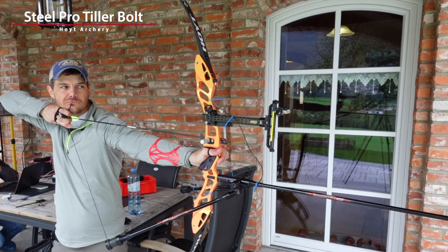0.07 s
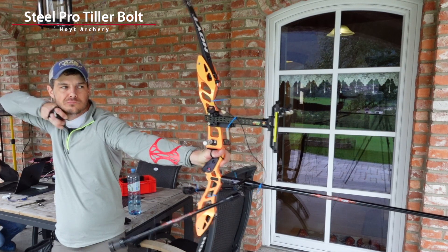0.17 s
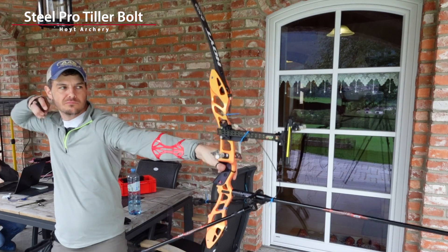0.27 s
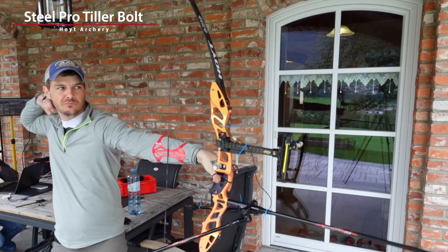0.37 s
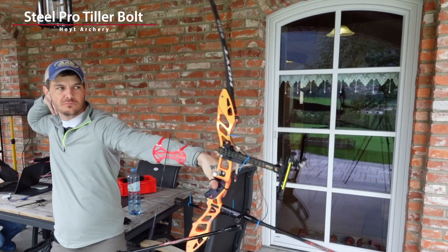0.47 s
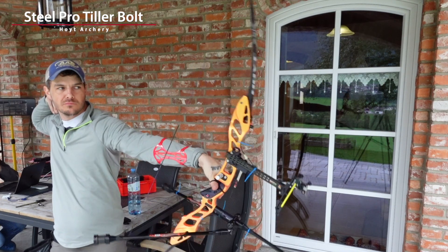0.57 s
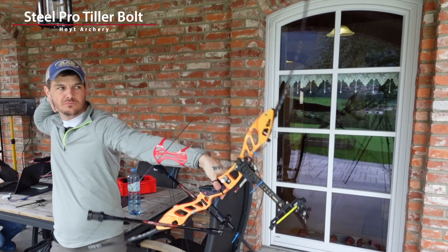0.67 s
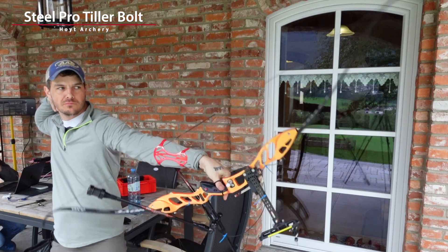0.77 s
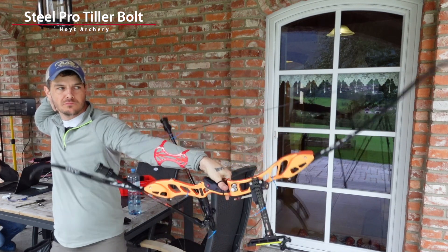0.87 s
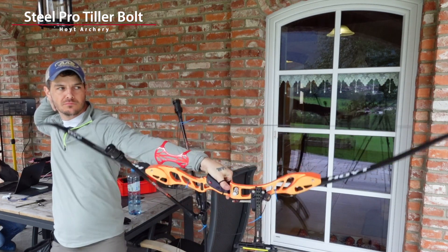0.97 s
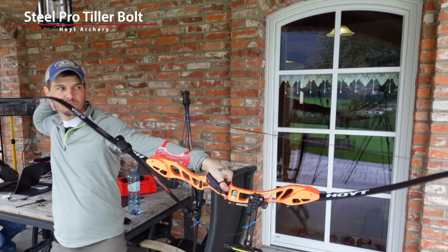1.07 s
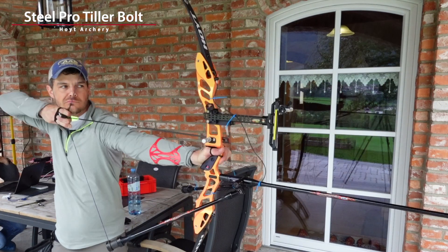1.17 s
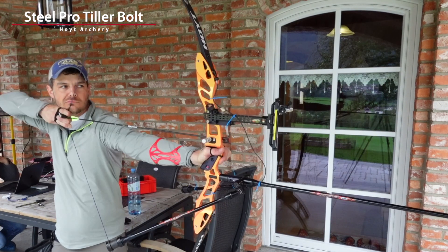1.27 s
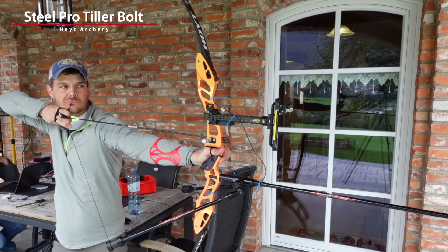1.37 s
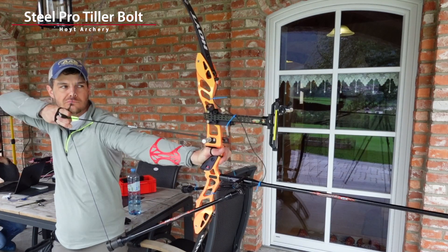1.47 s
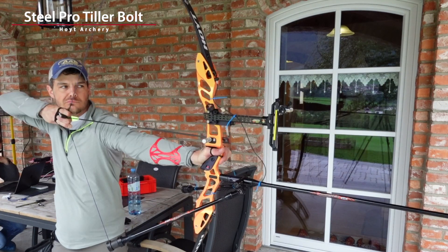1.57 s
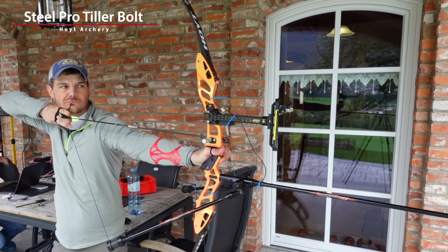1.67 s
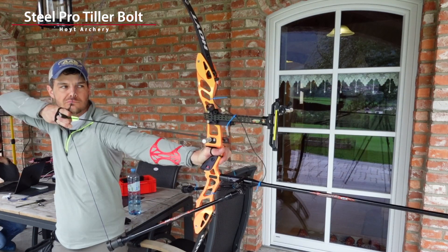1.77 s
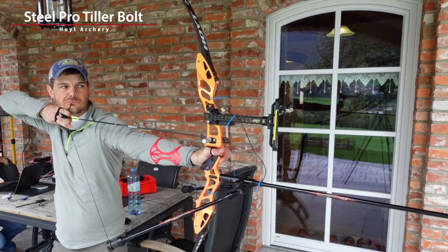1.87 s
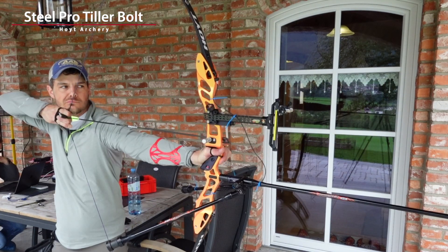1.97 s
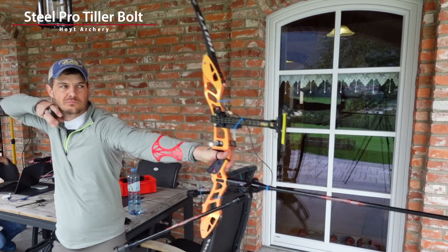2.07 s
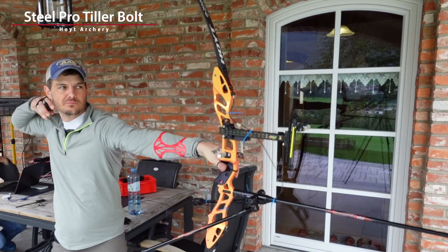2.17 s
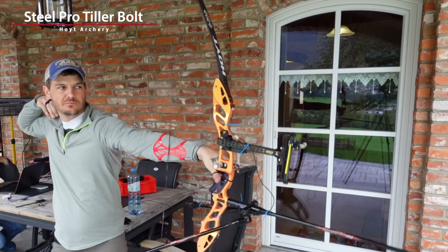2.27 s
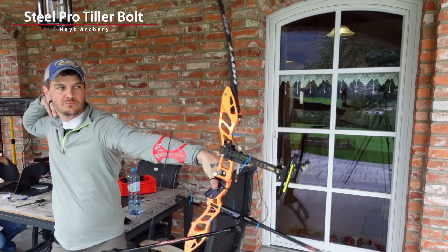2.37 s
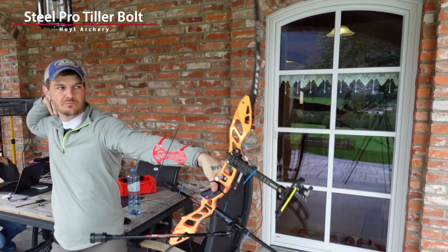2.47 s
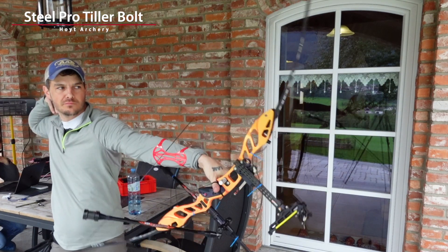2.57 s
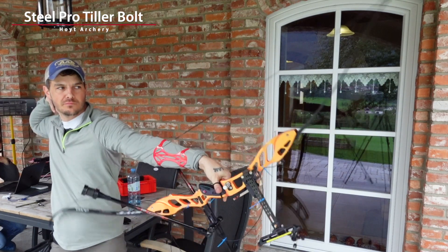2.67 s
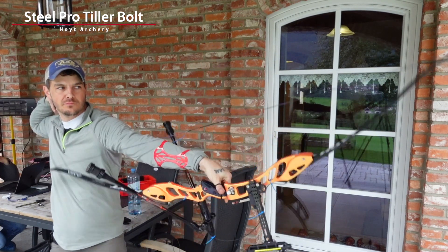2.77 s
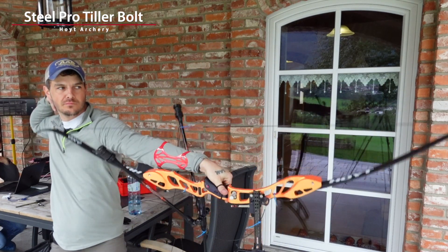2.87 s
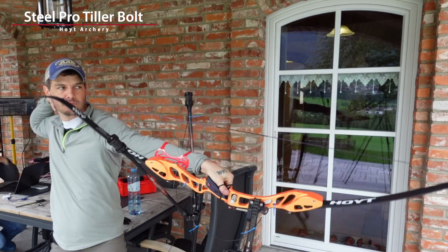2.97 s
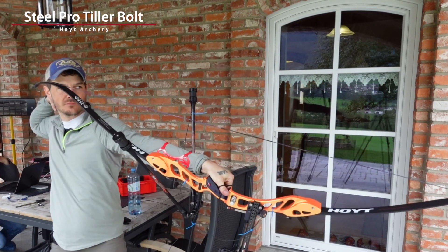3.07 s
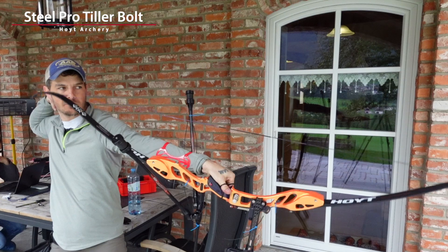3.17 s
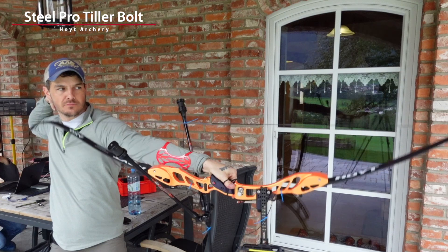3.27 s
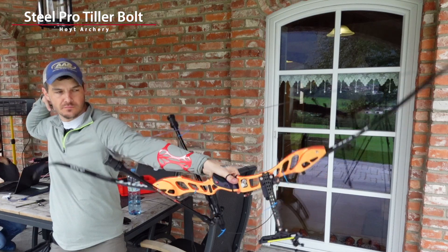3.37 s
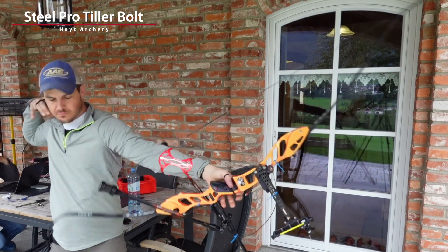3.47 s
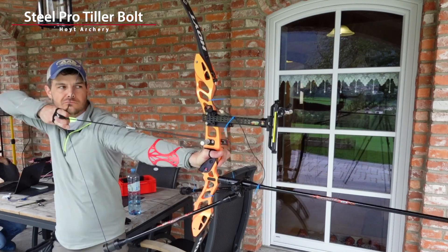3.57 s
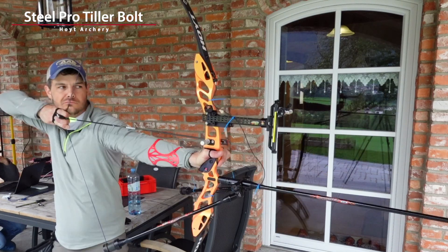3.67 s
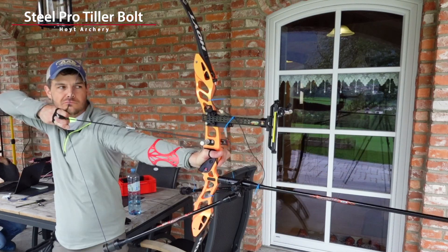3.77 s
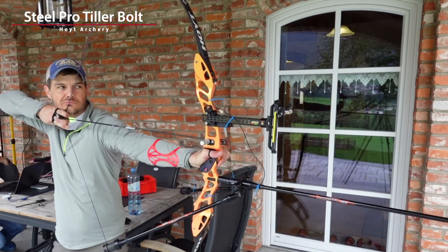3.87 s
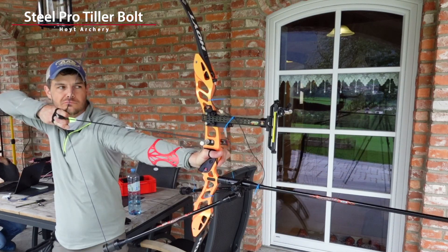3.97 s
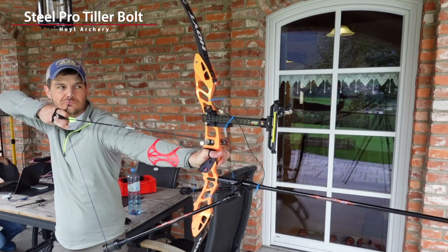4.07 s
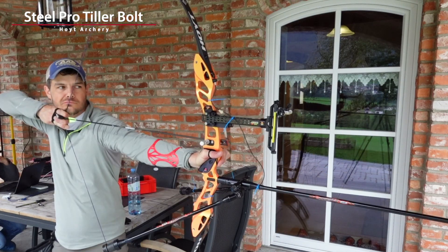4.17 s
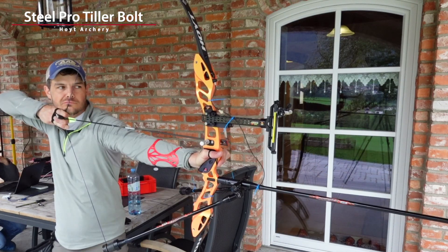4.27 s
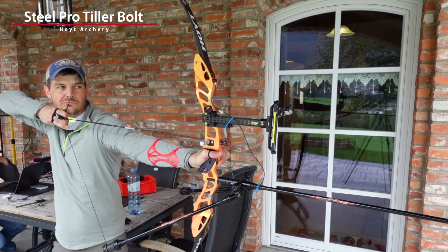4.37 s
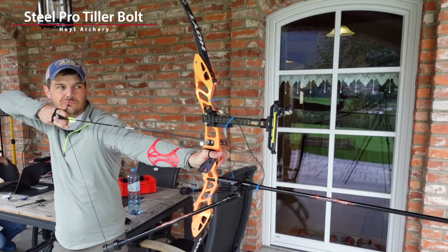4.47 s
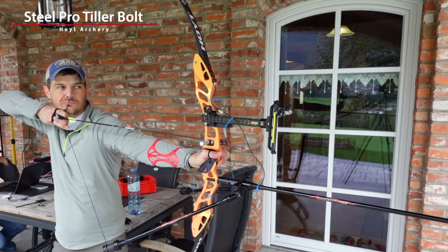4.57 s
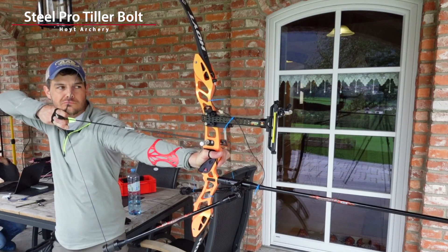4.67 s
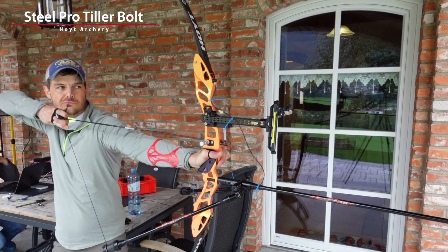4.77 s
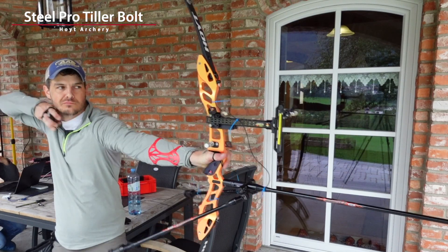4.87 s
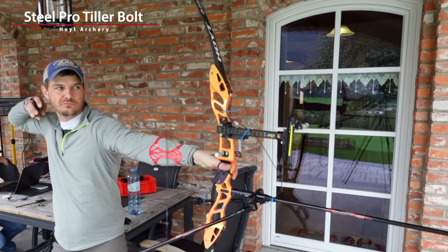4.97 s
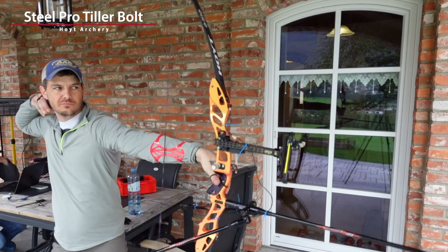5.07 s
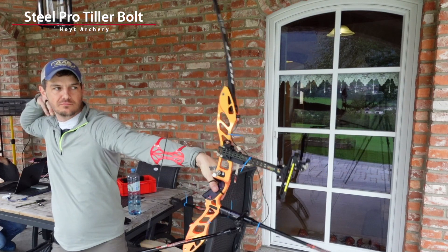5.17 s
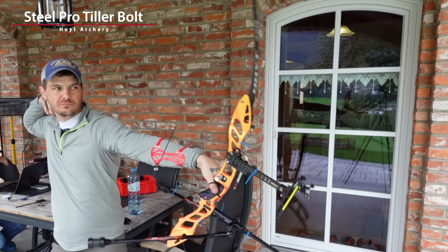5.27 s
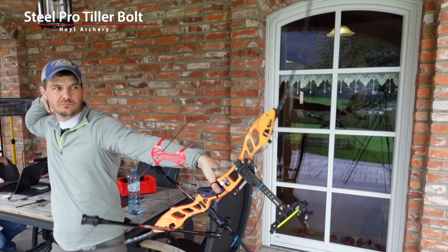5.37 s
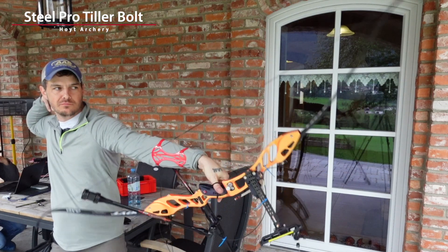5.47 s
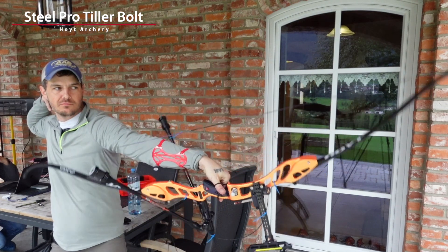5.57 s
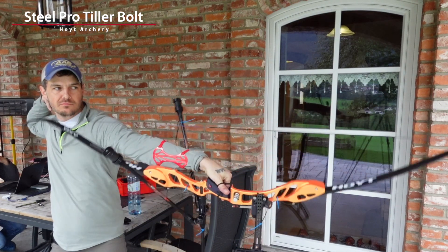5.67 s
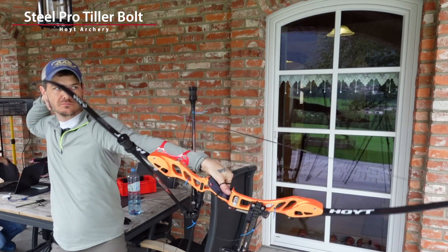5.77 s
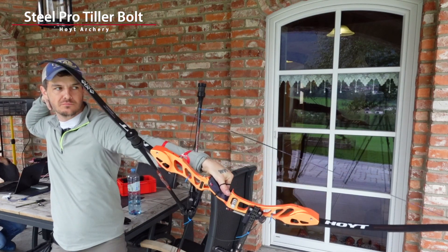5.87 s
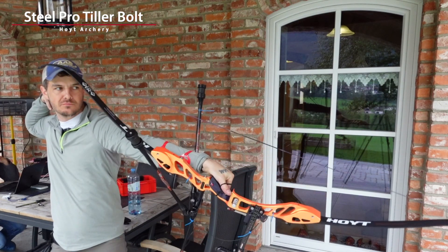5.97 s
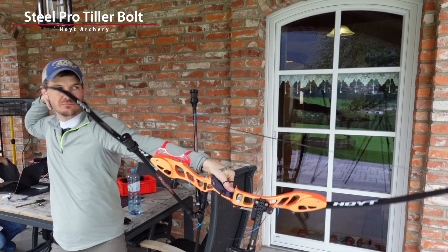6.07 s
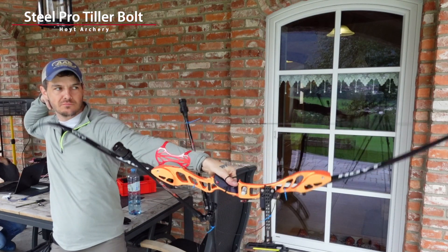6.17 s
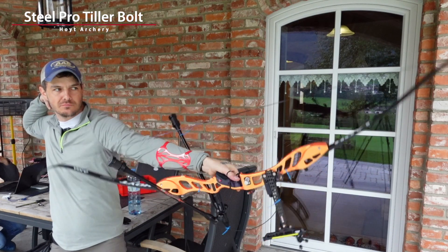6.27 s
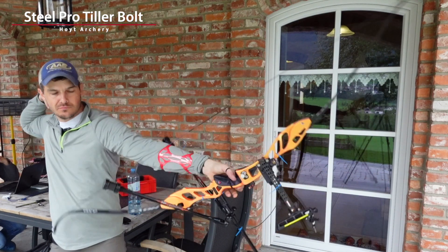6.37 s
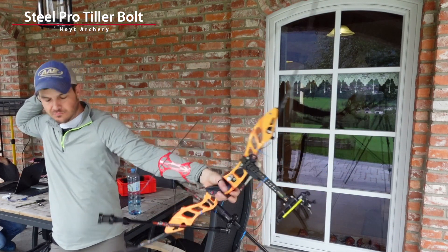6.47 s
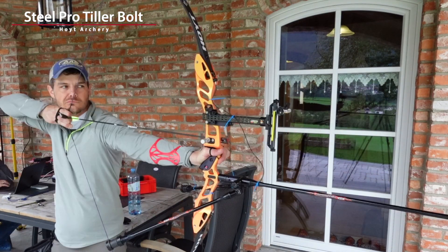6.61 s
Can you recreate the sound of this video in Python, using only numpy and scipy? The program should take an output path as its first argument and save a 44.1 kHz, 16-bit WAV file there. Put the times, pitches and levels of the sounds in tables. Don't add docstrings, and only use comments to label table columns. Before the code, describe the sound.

Outdoors on a brick porch, close microphone, warm airy garden hush. At 0.03 s a bright steel clicker snaps with a tiny bounce; at 0.2 s a bowstring whistles upward for about a hundredth of a second and slams, loud enough to clip, with a low twang near 200 Hz and buzzing, jangling fittings that die within a few tenths. A dull far target thud follows at 0.4 s in a soft echo swell. At 1.2 s the background cuts abruptly to darker hush with heavy wind lumps. Click at 1.91, slower shot at 2.09, sharp ticks around 2.2, thud at 2.28, faint steel ping, scattered buckle ticks 2.6 to 2.94. At 3.54 another cut; gusts fade by about 4.1. Click at 4.73, strongest slam at 4.9, weaker thud at 5.1 with faint ping, then quiet hush until a slight final gust near 6.6.

```python
import sys
import numpy as np
from scipy import signal
from scipy.io import wavfile
from scipy.ndimage import uniform_filter1d

SR = 44100
rng = np.random.default_rng(int(sys.argv[2]) if len(sys.argv) > 2 else 0)


def field_ratio(decibels):
    return 10 ** (np.asarray(decibels, dtype=float) / 20)


def store_pcm(level_fs):
    pcm = np.round(np.clip(level_fs, -1, 1) * 32767).astype(np.int16)
    wavfile.write(sys.argv[1], SR, np.atleast_2d(pcm).T)


N = 292824

# start in seconds, end in seconds.
TAKE_SPANS = [
    (0, 1.205),
    (1.205, 3.54),
    (3.54, 6.64),
]


def rms_one(x):
    return x / np.sqrt(np.mean(x ** 2) + 1e-20)


def at_hz(points, hz):
    table_hz, values = np.array(points).T
    return np.interp(np.log(hz), np.log(table_hz), values)


def band(x, low_hz, high_hz, order):
    sos = signal.butter(order, [low_hz, high_hz], "band", fs=SR, output="sos")
    return signal.sosfilt(sos, x)


def drift(rate_hz, size):
    r = np.exp(-2 * np.pi * rate_hz / SR)
    noise = rng.standard_normal(size + SR)
    return rms_one(signal.lfilter([1], [1, -2 * r, r * r], noise)[SR:])


def bands(size):
    edges_hz = 45 * 2 ** np.arange(0, 8.8, .5)
    white = rng.standard_normal((2, size + 4000))
    for k, (low, high) in enumerate(zip(edges_hz, edges_hz[1:])):
        yield np.sqrt(low * high), band(white[k % 2], low, high, order=2)[4000:]


def coloured(spectrum, size, patchy_db):
    total = np.zeros(size)
    for hz, noise in bands(size):
        total += noise * field_ratio(at_hz(spectrum, hz) + patchy_db * drift(9, size))
    return rms_one(total)


def ring(clicks, hz, t60):
    r = field_ratio(-60 / (t60 * SR))
    w = 2 * np.pi * hz / SR
    return signal.lfilter([0, np.sin(w)], [1, -2 * r * np.cos(w), r * r], clicks + 1e-18)


def struck(modes, blow, spread_db, lasting):
    total = np.zeros(len(blow))
    for hz, db, t60 in modes:
        total += field_ratio(db + spread_db * rng.standard_normal()) * ring(blow, hz, t60 * lasting)
    return total


def sway(db, hz, t60):
    click = np.eye(1, SR // 3)[0]
    return field_ratio(db) * band(ring(click, hz, t60), 20, 90, order=1)


def add(out, s, sound):
    i = round(s * SR)
    out[i:i + len(sound)] += sound[:N - i]


def garden():
    # frequency in Hz, level in dB per Hz.
    spectra = [
        [(35, -26), (60, 2.5), (81, 0), (274, 0.5), (330, 0), (371, -2), (492, -0.5), (1820, -8.5),
         (6430, -10.5), (13900, -33), (16000, -41)],
        [(59, -29), (100, -1), (335, -3.5), (381, -4), (634, -4.5), (2580, -14.5), (5420, -16), (7450, -18.5),
         (10900, -34), (15000, -32), (16000, -43.5)],
        [(35, -33), (60, -5.5), (103, 2), (130, -11), (156, -2), (287, -7.5), (437, -4.5), (2350, -14.5),
         (6280, -14.5), (13900, -36.5), (16000, -41)],
    ]
    levels_db = [-49.5, -57, -53.5]
    out = np.zeros(N)
    for (start, end), spectrum, db in zip(TAKE_SPANS, spectra, levels_db):
        size = round(end * SR) - round(start * SR)
        add(out, start, field_ratio(db) * coloured(spectrum, size, patchy_db=1.08))
    return out


def wind():
    calm_db = [-61.5, -48, -65]
    # centre in seconds, peak in dB, half length in seconds.
    gust_events = [(1.223, -31, .05), (1.458, -27, 0.1), (1.784, -33.5, 0.08), (1.922, -32.5, 0.024),
                   (2.045, -39.5, 0.065), (2.31, -44, 0.082), (2.492, -36, 0.03), (2.75, -36, 0.07),
                   (3.006, -44, 0.055), (3.166, -35.5, 0.04), (3.288, -41, 0.062), (3.595, -46, 0.057),
                   (3.777, -49, 0.059), (3.9, -45, 0.1), (4.133, -55, 0.074), (4.596, -59, .2),
                   (5.923, -59, 0.12), (6.64, -51, 0.037)]
    flutter_db, rumble_db = -23, -66.5
    lumps = band(rng.standard_normal(N + SR), 4.5, 19.6, order=3)[SR:]
    even = lumps / np.sqrt(uniform_filter1d(lumps ** 2, size=6000) + 1e-12)
    flutter = rms_one(band(rng.standard_normal(N + SR), 30, 90, order=2)[SR:])
    rumble = rms_one(band(rng.standard_normal(N + SR), 32, 55, order=2)[SR:])

    t = np.arange(N) / SR
    take = np.searchsorted([end for _, end in TAKE_SPANS[:-1]], t)
    gusts = sum(field_ratio(db) * np.exp(-((t - s) / half) ** 2) for s, db, half in gust_events)
    strength = field_ratio(np.array(calm_db))[take] + (take > 0) * gusts
    out = (even + field_ratio(flutter_db) * flutter) * strength + field_ratio(rumble_db) * rumble

    fade = np.arange(SR // 10) / SR
    step = np.exp(-fade / .012) * (1 - np.exp(-fade / 0.00032))
    add(out, TAKE_SPANS[1][0], -field_ratio(-34.0) * step)
    return out


def clicker():
    # time in seconds, peak in dB.
    drops = [
        (0.031, -11.5),
        (1.9123, -12.5),
        (4.7294, -12.5),
    ]
    # frequency in Hz, level in dB, t60 in seconds.
    blade_modes = [(1687, -10, .06), (1710, -8.5, 0.081), (1610, -17.5, 0.024), (2050, -14.5, .02),
                   (2430, -5, 0.018), (2910, -7, .03), (3500, -8, .03), (3920, -7, .02), (4400, -9, 0.021),
                   (5000, -3.5, 0.07), (5170, 3, 0.13), (5740, 2.5, .012), (6610, -7, .015),
                   (8000, -1, 0.0045), (9900, 3, 0.015), (11730, -2, .003), (13600, 4.5, .005)]
    # frequency in Hz, level in dB per Hz.
    crack_colour = [(410, -60.5), (700, -30), (1660, -5), (2560, -13.5), (5050, -7), (10100, -10),
                    (11100, -18), (13500, -8.5), (16000, -24.5)]
    out, blow = np.zeros(N), np.zeros(SR // 8)
    bounce = round(.00095 * SR)
    blow[0], blow[bounce] = .9, -.7
    t = np.arange(len(blow)) / SR
    landing, rebound = 1.3 * field_ratio(-60 * t / .003), np.roll(field_ratio(-60 * t / .008), bounce)
    shudder = landing + rebound + .2 * field_ratio(-60 * t / .06)
    for s, db in drops:
        add(out, s + .0006, field_ratio(db - 17.5) * struck(blade_modes, blow, spread_db=0.2, lasting=1))
        add(out, s + .0006, field_ratio(db - 6) * shudder * coloured(crack_colour, len(t), patchy_db=0.6))
    return band(out, 1250, 17500, order=3)


def flight(travel, slip_db, whistle_db, top_hz):
    t = np.arange(round((travel + 0.008) * SR)) / SR
    speed = np.clip(t / travel, 0, 1)
    pitch = top_hz * (.2 + .8 * speed) * (1 + 0.051 * drift(600, len(t)))
    tone = np.sin(2 * np.pi * np.cumsum(pitch) / SR) * (1 + 1.2 * drift(730, len(t)))
    swell = field_ratio(-50 * np.clip(.88 - speed, 0, 1))
    stop = field_ratio(-12000 * np.clip(t - travel, 0, 1))
    hiss = band(rng.standard_normal(len(t)), 620, 9500, order=2) * (.5 + np.exp(-t / 0.0022))
    slip = hiss * np.clip(t / 0.00061, 0, 1)
    return field_ratio(whistle_db) * tone * swell * stop + field_ratio(slip_db) * slip


def slam(slam_db, lasting, rattle_db):
    # frequency in Hz, level in dB, t60 in seconds.
    bow_modes = [(109, -28, 0.48), (147.6, -11.5, 0.37), (197.63, -2.5, 0.45), (228.8, 0.4, 0.21),
                 (288.3, -14, 0.16), (391.3, -9.5, 0.37), (477, -9, .22), (534.6, -7, 0.39),
                 (557, -9.5, 0.089), (659.4, -21.5, .2), (899, -12.5, 0.28), (915, -8.5, .2),
                 (950.7, -5.5, 0.13), (1407, -18, .15)]
    # frequency in Hz, level in dB, t60 in seconds.
    fitting_modes = [(1780, -1.5, .1), (2290, -7, .15), (2440, -5.5, .15), (2987, -6, .15),
                     (3628.8, -4, .2), (4290, -1.5, .1), (5040, -2.5, .15), (5590, 1, .15),
                     (5793, -2.5, 0.13), (7400, -8, 0.15)]
    # frequency in Hz, level in dB per Hz.
    rattle_colour = [(190, -32), (320, -1), (532, -1), (700, -11), (1300, -11.5), (1760, -8.5),
                     (2900, -10.5), (5610, -8.5), (10100, -19), (14000, -18), (16000, -28)]
    t = np.arange(SR // 2) / SR
    push = np.where(t < .0009, np.sin(np.pi * t / .0009), 0)
    body = struck(bow_modes, push / push.sum(), spread_db=1.5, lasting=lasting)
    body = band(body, 110, 5000, order=3)
    body = body * np.exp(-(t / 0.1) ** 3)

    string_beat = 1 + 0.61 * np.cos(2 * np.pi * 196 * t)
    buzz = string_beat * field_ratio(-60 * t / 0.18) * (1 - np.exp(-t / 0.0014))
    buzz = buzz * field_ratio(4.2 * drift(700, len(t)))
    shaken = struck(fitting_modes, buzz * rng.standard_normal(len(t)), spread_db=0.5, lasting=0.64)
    bright = buzz * coloured(rattle_colour, len(t), patchy_db=1.8) + field_ratio(-48.5) * shaken
    return field_ratio(slam_db) * body, field_ratio(rattle_db) * band(bright, 210, 21000, order=2)


def shots():
    # string reaches brace in seconds, travel in seconds, finger slip, whistle and slam in dB.
    releases = [
        (0.2064, .0132, -25, -3, -11.5),
        (2.085, 0.014, -17, -8.5, -12.5),
        (4.9018, 0.013, -14, -5.5, -11),
    ]
    whoosh, bright, low = np.zeros((3, N))
    for s, travel, slip_db, whistle_db, slam_db in releases:
        top_hz = 5088 * (.013 / travel) ** .6
        add(whoosh, s - travel, flight(travel, slip_db, whistle_db, top_hz))
        body, buzz = slam(slam_db, lasting=1.15, rattle_db=-13)
        add(bright, s - .002, buzz)
        add(low, s - .0004, body)
        add(low, s, sway(db=-35, hz=42, t60=.09))
    return whoosh, bright, low


def echo_swell(peak_db):
    t = np.arange(SR // 2) / SR - .05 - .03
    rise, fall, tail = 122 * t, -200 * t, -8 - 94 * t
    shape_db = np.minimum(rise, np.maximum(fall, tail))
    return field_ratio(peak_db + shape_db) * np.clip((t + 0.089) / 0.016, 0, 1)


def target():
    # time in seconds, thud in dB, echo peak in dB, pitch as a ratio.
    hits = [
        (.403, -1.3, -39.5, 1.03),
        (2.282, -1, -38, 1.12),
        (5.099, -5, -40, 0.99),
    ]
    # delay in seconds, peak in dB, pitch in Hz.
    thuds = [(.002, -27, 138), (.001, -29, 72.5), (.006, -24, 292), (.019, -17, 422), (.027, -26.5, 66.2),
             (.04, -22.5, 165), (.063, -32, 480), (.106, -31.5, 125)]
    # time in seconds, peak in dB, pitch in Hz.
    frame_knocks = [(2.29, -26, 900), (2.296, -18.5, 165.3), (2.32, -25.5, 760), (5.093, -28, 447)]
    # frequency in Hz, level in dB per Hz.
    dull_colour = [(41, -36), (70, -5.5), (171, -4), (315, -21), (410, -0.5), (616, -20), (943, -3.5),
                   (1160, -15), (2080, -17), (3390, -29.5), (9000, -27.5), (11700, -81), (19800, -120)]
    out, click = np.zeros(N), np.eye(1, SR // 5)[0]
    knocks = list(frame_knocks)
    for s, thud_db, _, ratio in hits:
        knocks += [(s + lag, db + thud_db, hz * ratio) for lag, db, hz in thuds]
    for s, db, hz in knocks:
        knock = band(ring(click, hz, 25.0 / hz), 39, 1570, order=1)
        add(out, s, -field_ratio(db - 4.5) * knock)
    for s, thud_db, echo_db, _ in hits:
        lumpy = field_ratio(1.86 * drift(127, SR // 2)) * coloured(dull_colour, SR // 2, patchy_db=1.5)
        add(out, s - .05, echo_swell(echo_db + 5) * lumpy)
        add(out, s, sway(-33 + thud_db, hz=47.6, t60=0.22))
    return out


def handling():
    # time in seconds, level in dB.
    pings = [
        (2.338, -59),
        (5.144, -57.5),
    ]
    # frequency in Hz, level in dB, t60 in seconds.
    steel_modes = [(6200, 0, 0.3), (6280, 4, 0.2), (8250, -1.5, 0.1), (9600, 4, 0.086), (10150, -12, .1),
                   (12750, -1.5, .06), (13000, 1.5, .06), (13400, -5, .07)]
    # time in seconds, peak in dB, colour in Hz.
    ticks = [(1.3995, -62, 9000), (2.1969, -23, 11000), (2.2034, -26, 11000), (2.288, -48, 9000),
             (2.298, -47, 8000), (2.5914, -56, 10000), (2.604, -46, 8000), (2.6131, -35.5, 5200),
             (2.62, -43, 5000), (2.642, -47, 4200), (2.6844, -57, 11000), (2.75, -53, 9000),
             (2.757, -46, 7000), (2.7844, -54, 6000), (2.9329, -46.5, 7040), (2.9352, -46, 7000),
             (2.94, -52, 5000), (3.1296, -61, 8000), (3.4793, -61, 8000), (5.078, -44, 8000)]
    # frequency in Hz, level in dB, t60 in seconds.
    buckle_modes = [(3480, -7, 0.008), (4250, -1.5, 0.011), (5290, 3, 0.0065), (6000, -2, 0.006),
                    (8450, -2, 0.0065)]
    out, click = np.zeros(N), np.eye(1, SR // 2)[0]
    t = np.arange(len(click)) / SR
    for s, db in pings:
        chatter = 0.045 * rng.standard_normal(len(t)) * field_ratio(-60 * t / .12)
        add(out, s, field_ratio(db) * struck(steel_modes, chatter, spread_db=2.5, lasting=0.8))
    for s, db, colour_hz in ticks:
        crack = band(rng.standard_normal(800), 0.58 * colour_hz, 1.4 * colour_hz, order=2)
        crack = crack * field_ratio(-60 * t[:800] / 0.014)
        add(out, s, field_ratio(db + 1.5) * crack)
        add(out, s, field_ratio(db - 6) * struck(buckle_modes, click[:4000], spread_db=2.5, lasting=1))
    return out


def porch(x, tail_db):
    # frequency in Hz, t60 in seconds.
    decay = [(100, 1), (260, 0.37), (700, 0.35), (1840, 0.3), (4850, 0.27), (9000, .2), (14000, 0.16)]
    # delay in seconds, level in dB.
    echoes = [
        (0.0099, -3.5),
        (.021, -13.5),
        (0.031, -11.5),
    ]
    t = np.arange(SR // 2) / SR
    tail = sum(noise * field_ratio(-60 * t / at_hz(decay, hz)) for hz, noise in bands(len(t)))
    response = field_ratio(tail_db) * tail * (1 - np.exp(-t / 0.0041))
    response[0] = 1
    for delay, db in echoes:
        response[round(delay * SR)] += field_ratio(db)
    return signal.fftconvolve(x, response)[:N]


def scene():
    whoosh, bright, low = shots()
    ticks = handling()
    crisp = bright + clicker() + .5 * ticks + 0.09 * whoosh
    near = 0.42 * ticks + porch(crisp, tail_db=-25.5) + porch(low, tail_db=-38.0)
    return (near + .7 * whoosh + target() + garden() + wind())[None]


def roll_off(x):
    return signal.sosfilt(signal.butter(12, 16520, fs=SR, output="sos"), x)


def record(dry):
    clipped = np.clip(1.6 * np.tanh(dry / 1.6), -.94, .94)
    low_pass = signal.cheby2(12, 70, 16550, fs=SR, output="sos")
    mix = signal.sosfilt(low_pass, clipped)
    return roll_off(mix)


dry = scene()
out = record(dry)
store_pcm(out)
```